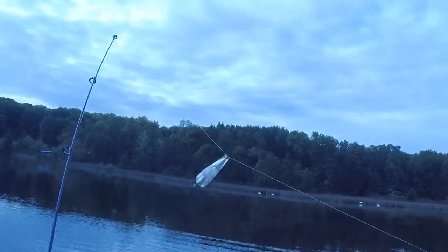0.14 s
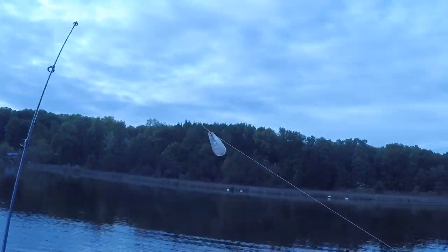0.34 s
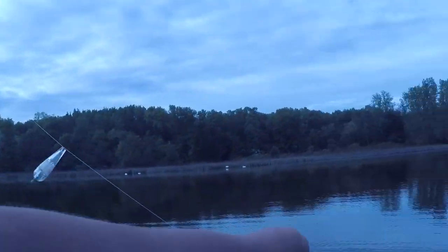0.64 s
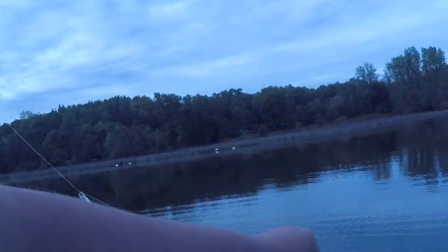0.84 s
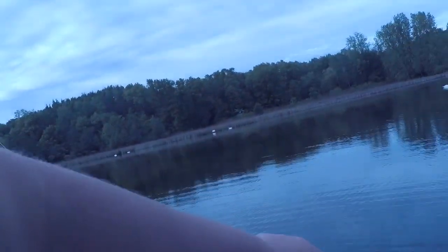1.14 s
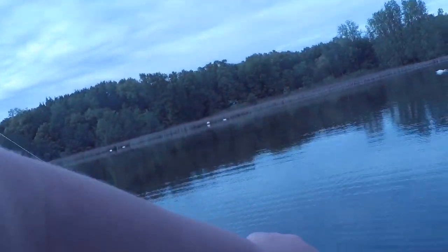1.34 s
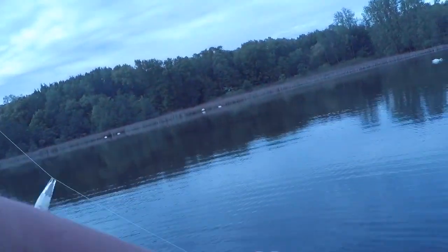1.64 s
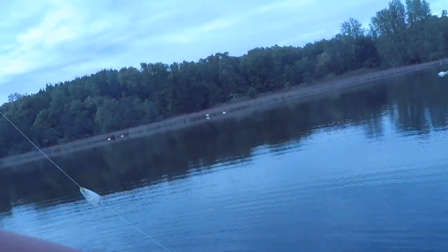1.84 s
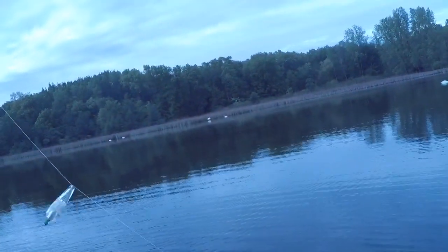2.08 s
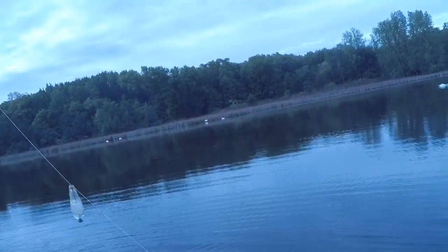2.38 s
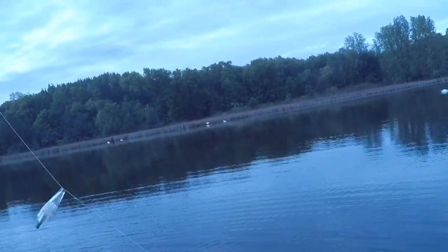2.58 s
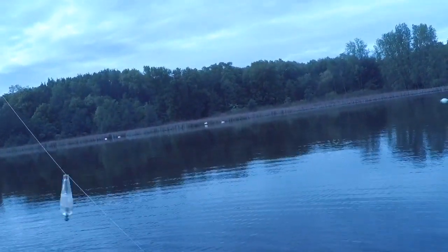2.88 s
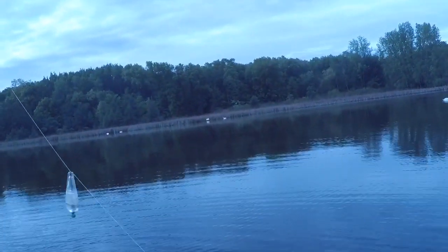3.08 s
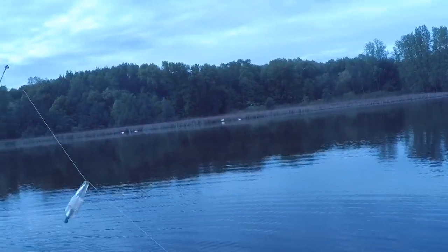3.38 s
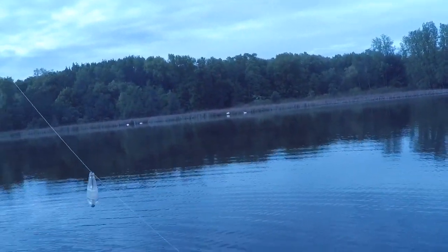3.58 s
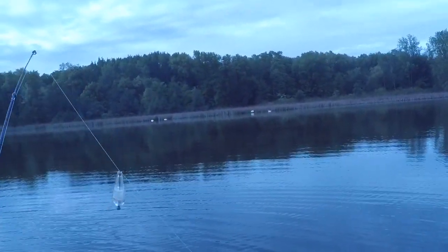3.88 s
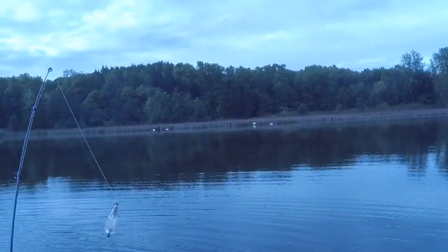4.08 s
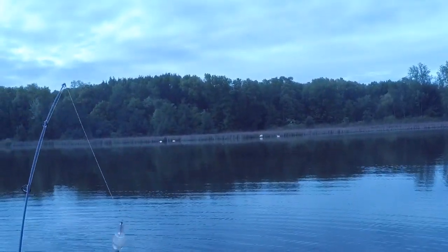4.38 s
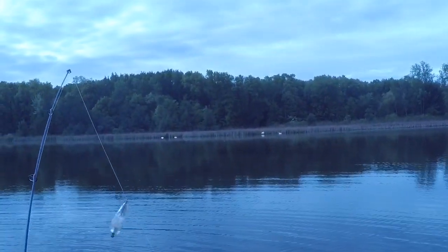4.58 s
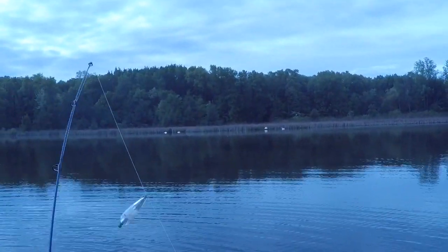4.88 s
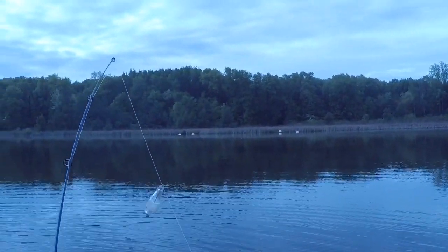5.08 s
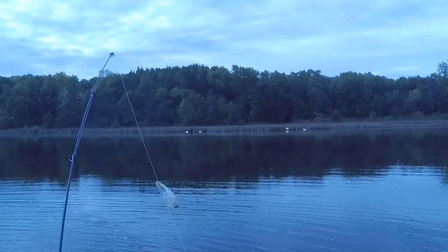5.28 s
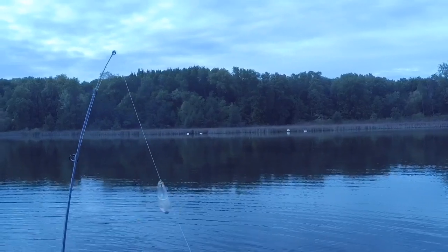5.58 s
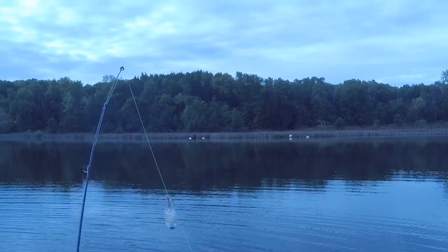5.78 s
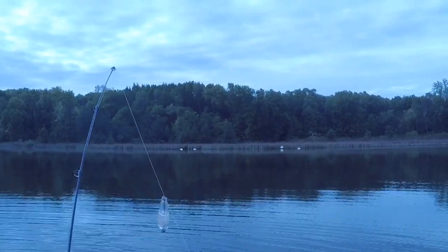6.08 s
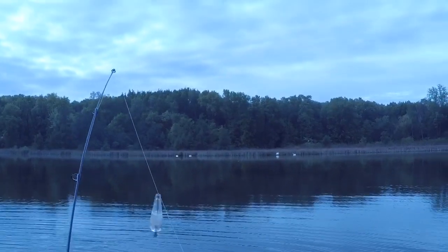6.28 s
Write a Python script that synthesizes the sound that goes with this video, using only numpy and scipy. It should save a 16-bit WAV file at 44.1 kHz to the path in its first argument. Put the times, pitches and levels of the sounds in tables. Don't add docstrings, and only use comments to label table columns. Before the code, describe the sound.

Close fishing-gear ticks, rubs and low thumps against a hard case, a sharp loud crack near four seconds, ending in a distant bird trill.

```python
import sys
import numpy as np
from scipy import signal
from scipy.fft import rfft, irfft
from scipy.io import wavfile

SR = 44100
rng = np.random.default_rng(int(sys.argv[2]) if len(sys.argv) > 2 else 0)


def level_to_linear(level):
    exponent = np.asarray(level, float) / 20
    return 10 ** exponent


def dump(signal):
    limited = np.clip(np.atleast_2d(signal).T, -1, 1)
    pcm = np.round(limited * 32767).astype(np.int16)
    wavfile.write(sys.argv[1], SR, pcm)


N = 283563


def rms_one(x):
    return x / np.sqrt(np.mean(x ** 2) + 1e-20)


def in_time(rows):
    s, *columns = np.transpose(rows)
    return [np.interp(np.arange(N) / SR, s, c) for c in columns]


def add(out, start_s, wave):
    i = max(round(start_s * SR), 0)
    out[i:i + len(wave)] += wave[:N - i]


def drift(rate_hz):
    r = np.exp(-2 * np.pi * rate_hz / SR)
    noise = rng.standard_normal(N + SR)
    return rms_one(signal.lfilter([1], [1, -2 * r, r * r], noise)[SR:])


def band(x, low_hz, high_hz):
    sos = signal.butter(2, [low_hz, high_hz], "band", fs=SR, output="sos")
    return rms_one(signal.sosfilt(sos, x))


def noise_band(low_hz, high_hz):
    return band(rng.standard_normal(N), low_hz, high_hz)


def swells(rows, bed_db):
    t = np.arange(N) / SR
    bells = sum(level_to_linear(db) * np.exp(-((t - middle_s) / half_s) ** 2) for middle_s, half_s, db in rows)
    return level_to_linear(bed_db) + bells


def struck(modes, rise_s, grip):
    t = np.arange(SR // 5) / SR
    rings = 0
    for k, (hz, db, t60) in enumerate(modes):
        rings = rings + (-1) ** k * level_to_linear(db - 60 * (t / t60) ** grip) * np.sin(2 * np.pi * hz * t)
    return rings * (1 - np.exp(-(t / rise_s) ** 2))


def bending_pulse(scale_s, stretch, fade_s, swell_s):
    t = np.arange(SR // 40) / SR
    swings = np.log1p(t / scale_s) / np.log(stretch)
    return np.sin(np.pi * swings) * np.exp(-(t / fade_s) ** 2) * (1 - 0.9 * np.exp(-t / swell_s))


# start_s, peak_db
PAWL_TICKS = [(1.029, -22), (1.146, -22.5), (1.915, -25), (2.058, -29.5), (2.355, -22), (2.472, -29.5),
              (2.557, -26.5), (2.6793, -26.5), (2.827, -25.5), (4.007, -28.5), (4.097, -28), (5.01, -24),
              (5.635, -22.5)]
# start_s, peak_db
PAWL_TOCKS = [(0.975, -31.5), (1.096, -39.5), (1.237, -32), (1.373, -32.5), (1.951, -33.5), (2.114, -40.5),
              (2.41, -37.5), (2.497, -35.5), (2.607, -34.5), (2.765, -37), (3.041, -44.5), (4.953, -37),
              (5.588, -36.5)]


def reel():
    out = np.zeros(N)
    tick = bending_pulse(scale_s=.00007, stretch=2.86, fade_s=0.0054, swell_s=.00002)
    tock = -bending_pulse(scale_s=0.0002, stretch=2.48, fade_s=0.0058, swell_s=0.0056)
    for s, db in PAWL_TICKS:
        add(out, s + 0.00285, level_to_linear(db - 10.0) * tick)
        add(out, s + 0.0095, level_to_linear(db - 19.5) * tick - level_to_linear(db - 32) * tock)
    for s, db in PAWL_TOCKS:
        add(out, s + 0.00272, level_to_linear(db + 8.5) * tock)
    grip_hz = 2400
    return signal.sosfilt(signal.butter(3, grip_hz, fs=SR, output="sos"), out)


# start_s, peak_db, then hollow_db, bright_db, sharp_db relative to the peak
KNOCK_HITS = [(0.4626, -41, -2, -19, -13), (0.6264, -30, -8, -7, -29), (0.63, -28, -3, -4, -23),
              (0.6418, -34.5, 2.5, 6.5, -5), (0.7, -47.5, 9, -4, -20), (0.7649, -46.5, 4, -1, -5),
              (1.2796, -32, 1.5, 6, -6), (1.291, -24.5, 0, -0.5, -32), (3.437, -36, 8, -15, -20),
              (3.8113, -3.5, -11, -2, -19), (3.8129, -10.5, -24, -17, -36), (4.2387, -44, -18, 7.5, 0.5)]
# pitch_hz, level_db, t60_s (time to fade by 60 dB)
BODY_TONES = [(1036, -11.5, 0.0064), (1378, 2.5, 0.0045)]
THUMP_TONES = [(220, -8.5, 0.019)]
HOLLOW_TONES = [(648, 0.5, 0.027), (820, -9.5, 0.026)]
BRIGHT_TONES = [(1800, 2.5, 0.0084), (2113, -4.5, 0.0095), (2544, -6.5, 0.0082)]
SHARP_TONES = [(3160, -11, 0.017), (3440, -6, 0.0038), (4350, -12, 0.0099), (5360, -10, 0.0065),
               (5850, -9, 0.0064), (7270, -21, 0.0079)]
# pitch_hz, level_db, t60_s
AFTER_RING = [(787, -28.5, 0.065), (1067, -25, 0.048), (1904, -31, 0.16), (2641, -36, 0.04)]


def knocks():
    out, contact_s = np.zeros(N), .0018
    body = struck(BODY_TONES, contact_s, grip=3.77) + struck(THUMP_TONES, 0.0027, grip=1.38)
    hollow = struck(HOLLOW_TONES, 0.00083, grip=0.73)
    bright = struck(BRIGHT_TONES, contact_s, grip=1.54) + struck(AFTER_RING, 0.0013, grip=1)
    t = np.arange(len(body)) / SR
    crack_db = -22.5 - 60 * ((t - .0022) / 0.0016) ** 2
    crack = band(rng.standard_normal(len(t)), 6000, 11000) * level_to_linear(crack_db)
    sharp = struck(SHARP_TONES, contact_s, grip=1.74) + crack
    groups = np.array([body, hollow, bright, sharp])
    for s, db, *parts_db in KNOCK_HITS:
        add(out, s - .0004, level_to_linear(db + 5.5 + np.array([0, *parts_db])) @ groups)
    return out


# start_s, pitch_hz, level_db, t60_s
FITTING_RINGS = [
    (0.461, 620, -29, .045),
    (0.645, 1890, -49, .15),
    (0.761, 1190, -36, .04),
    (1.298, 1890, -48, .3),
]
# start_s, pitch_hz, level_db, t60_s
KNUCKLE_RAPS = [(.6258, 1470, -24.5, 0.0068), (.6305, 5800, -50, 0.0068), (.6418, 2480, -34, .006),
                (1.2786, 2150, -18, 0.0081), (1.2798, 2700, -23.5, .008), (1.2895, 1173, -23.5, 0.0072),
                (1.278, 5800, -39, 0.0057), (4.2385, 1170, -26, 0.0069), (4.245, 1150, -38, 0.0079),
                (4.277, 1140, -47, .009), (5.854, 4600, -54, 0.0087), (5.854, 5600, -56, 0.0094),
                (5.854, 6450, -61, .008), (5.899, 5000, -63.5, .012)]


def fittings():
    out = np.zeros(N)
    for s, hz, db, t60 in FITTING_RINGS:
        add(out, s, struck([(hz, db, t60)], rise_s=0.0016, grip=1))
    for s, hz, db, t60 in KNUCKLE_RAPS:
        add(out, s, struck([(hz, db, t60)], rise_s=.002, grip=4))
    return out


# start_s, length_s, shell_db, hollow_db relative to shell
HAND_SCUFFS = [(1.2765, 0.0033, -30.5, -10), (.495, 0.052, -72, 12), (1.288, 0.0041, -58, 11),
               (1.297, 0.013, -52.5, 5), (1.31, 0.024, -54, -2), (.645, 0.011, -63, -11),
               (2.654, 0.042, -55.5, 1.5), (2.87, 0.014, -48, 2.5), (2.915, 0.01, -38, -3),
               (2.942, 0.0084, -54.5, 7.5), (2.898, 0.011, -51.5, -19), (3.083, 0.022, -41.5, 1),
               (3.112, 0.012, -57, 1), (3.19, 0.0099, -64.5, 8.5), (3.258, 0.013, -52, 0.5),
               (3.292, 0.018, -38.5, -2.5), (3.311, 0.0091, -48, -5), (3.338, 0.068, -53.5, -3),
               (3.358, 0.015, -48, -5), (3.405, 0.03, -50.5, 4), (3.45, 0.0083, -61, 2),
               (3.459, 0.015, -36.5, -7), (3.52, 0.02, -51.5, -5), (3.54, 0.017, -52.5, -7),
               (3.563, 0.0087, -52, -3), (3.572, 0.0076, -38.5, -4), (3.586, 0.0047, -36.5, 0.5),
               (3.645, 0.035, -42.5, -5), (3.675, 0.027, -43, -4.5), (3.7, 0.012, -51, -11),
               (3.742, 0.022, -47.5, -9), (3.764, .018, -46.5, -0.5), (3.791, 0.0038, -53, -7),
               (3.8, .008, -52, -12), (3.814, 0.0067, -52, 18), (3.856, 0.014, -34.5, -7),
               (3.895, 0.0039, -59, -14)]
# start_s, length_s, level_db
CLOTH_STROKES = [(0.004, 0.006, -82), (0.065, 0.014, -54.5), (0.122, .005, -53), (0.238, 0.0052, -76),
                 (0.52, 0.0089, -70), (0.843, .008, -54), (1.047, 0.0091, -58), (0.096, 0.0038, -50),
                 (0.1, 0.058, -60.5), (0.26, 0.11, -60), (0.402, 0.072, -55), (0.622, 0.008, -38.5),
                 (0.954, 0.03, -55.5), (1.027, 0.019, -51), (1.33, 0.058, -64), (1.567, 0.051, -63),
                 (1.751, 0.0032, -56), (1.97, 0.0087, -57), (2.44, 0.032, -59.5), (2.48, 0.024, -61),
                 (2.543, 0.018, -53.5), (2.128, 0.0069, -55), (2.733, 0.015, -57.5), (3.011, 0.0049, -60),
                 (3.044, 0.028, -57), (3.932, 0.0066, -67), (4.033, 0.0035, -72), (4.086, 0.024, -62),
                 (4.17, 0.0094, -55.5), (4.192, 0.0094, -55), (4.213, 0.0049, -53.5), (4.297, .007, -61.5),
                 (4.468, 0.0049, -63), (4.657, 0.0092, -66.5), (4.677, .008, -64), (4.746, .006, -62),
                 (5.177, 0.0061, -63.5), (5.341, 0.0057, -57), (5.579, 0.006, -55.5), (4.699, 0.023, -63),
                 (4.827, 0.012, -58), (5.131, 0.01, -57.5), (5.267, 0.057, -60.5), (5.361, 0.0085, -52.5),
                 (5.39, 0.0051, -52.5), (5.518, 0.024, -57), (5.607, 0.0041, -51.5)]
# start_s, level_db
CAVITY_TAPS = [(0.638, -62), (1.144, -53), (2.522, -53), (2.987, -61), (4.122, -58.5), (4.151, -61.5),
               (4.244, -57), (4.283, -60.5), (4.346, -64.5), (4.481, -52.5), (4.546, -49.5), (4.647, -62),
               (4.734, -53), (4.984, -47.5), (5.046, -53.5), (5.314, -81), (6.075, -69)]


def contacts():
    tap_hollow_db, stroke_hollow_db = 7, -7
    slips = [(.757 + k * .0455, 0.007, -56.5, tap_hollow_db) for k in range(5)]
    strokes = [(s, length, db, stroke_hollow_db) for s, length, db in CLOTH_STROKES]
    taps = [(s, 0.0084, db, tap_hollow_db) for s, db in CAVITY_TAPS]
    return HAND_SCUFFS + slips + strokes + taps


# time_s, level_db
RUB_PRESSURE = [(0.0, -53.5), (0.11, -62), (0.53, -59), (0.72, -59.5), (1.07, -63.5), (1.52, -73.5),
                (2.04, -61.5), (2.65, -66), (3.31, -68.5), (3.47, -57.5), (3.72, -56.5), (3.87, -58.5),
                (4.12, -68), (4.32, -72), (4.6, -65.5), (5.28, -72), (5.53, -67), (6.43, -71.5)]


def rubbing_force():
    rub_db, = in_time(RUB_PRESSURE)
    shell = level_to_linear(rub_db + 1.0 * drift(25) + 3.7 * drift(1.2))
    cavity = shell * level_to_linear(-2.5)
    for s, length, db, hollow_db in contacts():
        t = np.arange(int((length + .03) * SR)) / SR
        rise = np.minimum(t / (0.0022 + 0.25 * length), 1)
        stroke = level_to_linear(db) * rise * np.exp(-np.maximum(t - length, 0) / 0.0044)
        add(shell, s, stroke)
        add(cavity, s, stroke * level_to_linear(hollow_db))
    return shell, cavity


def rough_grit():
    grit = rng.standard_normal((2, N)) * level_to_linear(2.5 * drift(294.8))
    snags_per_s, snag_db = 450, 8.5
    return grit * (1 + level_to_linear(snag_db) * (rng.random(N) < snags_per_s / SR))


def resonate(x, peaks):
    out = 0
    for k, (hz, width_hz, db) in enumerate(peaks):
        r = np.exp(-np.pi * width_hz / SR)
        ring = signal.lfilter([1, 0, -1], [1, -2 * r * np.cos(2 * np.pi * hz / SR), r * r], x)
        out = out + (-1) ** k * level_to_linear(db) * (1 - r * r) * ring
    return out


# pitch_hz, width_hz, level_db
CAVITY_PEAKS = [(617, 270, -9.5), (790, 110, -1.5), (1053, 270, 1), (1284, 618, -1.5)]
# pitch_hz, width_hz, level_db
SHELL_PEAKS = [(1820, 260, 3), (2340, 550, 6), (2656, 197, 9.5), (3310, 210, -8), (3900, 160, -8),
               (4400, 460, -16.5), (5800, 270, -10.5), (7180, 290, -52.5)]


def friction(shell, cavity, grit):
    low = resonate(grit[0] * cavity, CAVITY_PEAKS) / np.std(resonate(grit[0], CAVITY_PEAKS))
    high = resonate(grit[1] * shell, SHELL_PEAKS) / np.std(resonate(grit[1], SHELL_PEAKS))
    wall_hz = 7000
    case = signal.sosfilt(signal.butter(4, wall_hz, fs=SR, output="sos"), low + high)
    shove = level_to_linear(-5.5) * cavity * band(noise_band(69.93, 290), 69.93, 290)
    return case + shove


# start_s, peak_db
PING_GRAINS = [(1.294, -50), (2.653, -55), (2.662, -59), (2.693, -44), (2.7, -50), (2.922, -33),
               (3.097, -31.5), (3.302, -27), (3.453, -53), (3.478, -36), (3.542, -42), (3.562, -38),
               (3.581, -27), (3.625, -43), (3.65, -31.5), (3.663, -31), (3.716, -43), (3.845, -42),
               (3.895, -39), (4.043, -48.5), (4.237, -46), (5.829, -62)]
# pitch_hz, level_db, t60_s
PING_TONES = [(2700, 2.5, 0.028), (2595, -6, 0.018)]


def pings():
    out, ring = np.zeros(N), struck(PING_TONES, 0.0013, grip=0.99)
    for s, db in PING_GRAINS:
        add(out, s, level_to_linear(db) * ring)
    return out


# middle_s, half_length_s, level_db
SLEEVE_PASSES = [
    (0.2, 0.41, -58),
    (0.7, 0.23, -53.5),
    (1.4, 0.39, -64),
    (2.62, 0.13, -62),
    (3.8, 0.15, -59.5),
    (5.25, 0.16, -73.5),
]


def sleeve(grit):
    flutter = level_to_linear(-6.0 + 2.0 * drift(30))
    swish = swells(SLEEVE_PASSES, bed_db=-87.0) * flutter * band(noise_band(2950, 4090), 2800, 4740)
    dull = band(band(grit[0], 2800, 3500), 2800, 3500)
    return swish + swells(SLEEVE_PASSES[:2], bed_db=-93) * level_to_linear(-16.0) * dull


def swing(hz, damping, lean):
    t = np.arange(-SR // 25, SR // 25) / SR
    return -np.cos(2 * np.pi * hz * t + lean) * np.exp(-(damping * hz * t) ** 2)


# time_s, level_db
BODY_SWAY = [(0.0, -44), (0.5, -42.5), (0.88, -44), (1.23, -39), (1.59, -53.5), (2.4, -47.5), (2.9, -47),
             (3.76, -48.5), (4.15, -45.5), (4.48, -48), (5.6, -51), (6.43, -55)]
# middle_s, half_length_s, level_db
BODY_LURCHES = [(1.55, 0.045, -43.5), (1.77, 0.2, -48), (2.09, 0.032, -36.5), (2.27, 0.013, -61),
                (2.38, 0.033, -42.5), (2.76, 0.011, -35.5), (2.89, 0.034, -47), (3.29, 0.028, -40),
                (3.73, 0.043, -44), (3.89, 0.082, -40.5), (4.55, 0.053, -38.5), (4.77, 0.067, -44),
                (5.01, 0.042, -41.5), (5.19, 0.042, -47), (5.61, 0.018, -49), (5.86, 0.057, -43.5)]
# middle_s, half_length_s, level_db
MOUNT_SHAKES = [(1.3, 0.14, -54), (1.6, 0.037, -72), (2.1, 0.054, -66), (2.38, 0.11, -50),
                (2.52, 0.044, -45), (2.72, 0.065, -60), (2.9, 0.079, -50), (3.4, 0.37, -62),
                (4.12, 0.13, -48.5), (4.3, 0.012, -41), (4.56, 0.019, -50), (4.8, .1, -60.5),
                (5.3, .06, -59), (5.7, 0.042, -55), (6.03, 0.31, -57.5)]
# middle_s, peak_db, pitch_hz
MOUNT_THUDS = [(0.133, -34, 60), (0.595, -35, 69.5), (0.778, -38, 82), (0.904, -34, 53.0),
               (0.935, -29, 51.7), (1.213, -30, 48), (1.449, -40, 82.0), (1.507, -33.5, 85.6),
               (2.106, -34, 48.0), (2.252, -34.5, 78.4), (2.381, -37, 59.0), (2.884, -27.5, 61.5),
               (2.958, -29.5, 75), (3.202, -35, 58.0), (3.327, -32, 62.0), (3.38, -28.5, 76),
               (3.885, -30, 77.5), (3.953, -38, 56), (4.557, -33.5, 70.6), (4.995, -25.5, 87.5),
               (5.061, -32.5, 78),
               (0.077, -35, 86), (0.365, -36, 100), (0.462, -31, 163), (0.503, -40, 96), (0.535, -38, 118),
               (0.6397, -24, 106), (0.806, -36, 141), (1.2955, -29.5, 88), (2.175, -36, 120),
               (2.69, -27.5, 55.6), (3.068, -35.5, 119), (3.125, -31, 122), (3.271, -31.5, 123),
               (3.299, -33, 151), (3.438, -40, 183), (3.594, -35, 144), (3.863, -35, 113.6),
               (4.488, -31, 125), (4.75, -28.5, 111), (5.535, -33, 101)]
# middle_s, peak_db, pitch_hz
SHORT_JOLTS = [(0.307, -51, 220), (0.369, -41.5, 225), (0.402, -43, 220), (0.482, -40, 199),
               (0.495, -44, 220), (0.563, -45, 220), (0.631, -29, 203), (0.637, -24, 202),
               (0.706, -27.5, 205), (0.862, -44, 230), (0.934, -42, 200), (0.963, -44, 260),
               (1.335, -40, 220), (1.501, -48, 200), (1.612, -46, 196), (2.243, -42.5, 201),
               (2.671, -39, 205), (2.882, -31, 220), (2.966, -45, 180), (3.053, -38, 195),
               (3.257, -49, 220), (3.323, -42, 200), (3.376, -37, 200), (3.4299, -33, 261),
               (3.444, -27, 203), (3.452, -31, 196), (3.688, -38, 202), (3.767, -35, 200),
               (3.827, -26, 201), (3.839, -46, 200), (3.891, -40, 202), (4.29, -46.5, 230),
               (4.545, -44, 220), (4.565, -38, 177), (4.781, -46, 220), (4.865, -47.5, 260),
               (4.968, -55.5, 220), (5.328, -47.5, 302),
               (0.474, -41, 200), (.91, -42, 220), (2.678, -46, 250), (2.871, -44, 220), (3.062, -44, 200),
                (3.596, -30, 254), (3.674, -49, 200), (3.879, -46, 200), (4.47, -48, 280),
                (4.555, -37, 220)]
# middle_s, peak_db, pitch_hz
WALL_RAPS = [
    (0.6324, -21.5, 1010),
    (2.674, -39.5, 1300),
    (2.879, -56, 700),
    (3.297, -52, 596),
    (3.4293, -34, 920),
    (3.438, -24.5, 1110),
    (3.588, -43, 604),
    (3.68, -30.5, 1300),
    (4.553, -41, 740),
]


def sway():
    heave_db, = in_time(BODY_SWAY)
    out = swells(BODY_LURCHES, heave_db) * noise_band(15.6, 44.6)
    rumble = level_to_linear(-9.5 + 1.0 * drift(37)) * noise_band(48, 192.0)
    out += swells(MOUNT_SHAKES, bed_db=-61) * rumble
    centre_s = .04
    tugs = MOUNT_THUDS
    for (s, db, hz), lean in zip(tugs, rng.uniform(-0.81, 1, len(tugs))):
        add(out, s - centre_s, level_to_linear(db - 2.0) * swing(hz, damping=2.56, lean=0.2 * lean))
    for s, db, hz in SHORT_JOLTS:
        add(out, s - centre_s, level_to_linear(db - 3.5) * swing(hz, damping=1.4, lean=0))
    for s, db, hz in WALL_RAPS:
        add(out, s - centre_s, level_to_linear(db) * swing(hz, damping=0.74, lean=0))
    return out


def note(length_s, start_hz, middle_hz, end_hz):
    u = np.linspace(0, 1, int(length_s * SR))
    hz = np.polyval(np.polyfit([0, .5, 1], [start_hz, middle_hz, end_hz], 2), u)
    loudness = np.minimum(2.5 * np.sin(np.pi * u), 1) ** 1.7
    return np.sin(2 * np.pi * np.cumsum(hz) / SR) * loudness


def chip(bend, fall_db):
    length_s, foot_hz, top_hz = 0.0212, 3710, 4445
    u = np.linspace(-1, 1, int(length_s * SR))
    hz = bend * (top_hz - (top_hz - foot_hz) * np.abs(u) ** 2.49)
    loudness = level_to_linear(fall_db * (u + 1) / 2) * np.minimum(2.5 * (1 - u * u), 1)
    return loudness * np.sin(2 * np.pi * np.cumsum(hz) / SR)


# time_s, pitch_hz, level_db
LONG_WHISTLE = [
    (5.69, 2545, -81),
    (5.73, 2252, -52),
    (5.76, 2200, -52.5),
    (5.84, 2218, -54),
    (5.875, 2163, -63.5),
    (5.89, 2180, -73.5),
]
# time_s, pitch_hz, level_db
REPLY = [
    (6.236, 2509, -81),
    (6.265, 2443, -61),
    (6.312, 2370, -72.5),
    (6.39, 2490, -62.5),
    (6.43, 2480, -70.5),
]
# start_s, middle_hz, level_db
SHORT_DROPS = [(4.198, 3950, -70), (4.29, 4050, -75), (4.558, 4170, -65), (5.28, 4220, -72),
               (5.42, 2890, -72), (5.452, 2870, -77), (5.48, 2900, -74), (5.51, 2900, -75),
               (5.59, 2850, -74), (5.655, 2800, -75), (6.275, 3440, -75.5), (6.3, 3420, -76.5)]
# start_s, length_s, pitch_hz, level_db
THIN_NOTES = [(.2, 0.059, 2460, -67), (2.995, 0.042, 4130, -78), (3.515, 0.02, 4326, -62.5),
              (3.84, 0.023, 4340, -67), (3.923, 0.018, 4360, -68), (4.02, 0.023, 4390, -73),
              (4.073, 0.036, 4320, -71), (4.15, .03, 4400, -80), (1.832, 0.05, 4020, -75),
              (5.622, 0.02, 4320, -67)]
# start_s, middle_hz, level_db
FALLING_NOTES = [
    (4.361, 4220, -77),
    (4.374, 4170, -73),
    (4.468, 4200, -72),
]
# start_s, length_s, held_hz, end_hz, level_db
LOW_WHISTLES = [
    (3.955, 0.11, 2190, 2180, -64),
]
# start_s, peak_db
TRILL = [
    (5.702, -53),
    (5.785, -50.5),
    (5.878, -49.5),
    (5.97, -48.5),
    (6.067, -48.5),
    (6.158, -48),
    (6.262, -48.5),
    (6.377, -45),
]
# start_s, length_s, start_hz, end_hz, level_db
NEAR_NOTES = [(0.012, .055, 4240, 4350, -56.5), (0.29, .055, 4210, 4230, -61.5),
              (.345, .03, 4190, 4200, -63), (0.439, .03, 4580, 4430, -60),
              (0.563, 0.041, 4240, 4240, -59.5), (0.843, 0.035, 4130, 4030, -56.5),
              (1.962, .022, 4130, 3800, -58), (3.012, .022, 4200, 4250, -60),
              (3.438, .022, 4030, 4350, -57), (3.596, .018, 4330, 4330, -56), (5.293, .04, 3420, 3420, -67),
              (5.325, .045, 3400, 3370, -67)]


def birds():
    hz, whistle_db = in_time([(5.66, 2600, -95), *LONG_WHISTLE, (5.91, 2190, -90)])
    out = level_to_linear(whistle_db + 2.5) * np.sin(2 * np.pi * np.cumsum(hz) / SR)
    hz, reply_db = in_time([(6.2, 2520, -95), *REPLY])
    begun = np.arange(N) > 6.2 * SR
    out += level_to_linear(reply_db + 3.5) * begun * np.sin(2 * np.pi * np.cumsum(hz) / SR)
    for s, hz, db in SHORT_DROPS:
        add(out, s, level_to_linear(db + 8.5) * note(0.018, 1.03 * hz, hz, hz / 1.03))
    for s, length, hz, db in THIN_NOTES:
        add(out, s, level_to_linear(db + 8.5) * note(length, .992 * hz, hz, .992 * hz))
    for s, hz, db in FALLING_NOTES:
        add(out, s, level_to_linear(db + 17.5) * note(0.0167, 1.05 * hz, hz, 0.88 * hz))
    for s, length, hz, end_hz, db in LOW_WHISTLES:
        add(out, s, level_to_linear(db + 2.5) * note(length, 1.025 * hz, hz, end_hz))
    variety = rng.normal([1, -2], [.007, 2.5], (len(TRILL), 2))
    for (s, db), (bend, fall_db) in zip(TRILL, variety):
        add(out, s - .002, level_to_linear(db - 0.5) * chip(bend, fall_db))
    for s, length, start_hz, end_hz, db in NEAR_NOTES:
        add(out, s, level_to_linear(db) * note(length, start_hz, (start_hz + end_hz) / 2, end_hz))
    t = np.arange(SR // 5) / SR
    trees = rng.standard_normal(len(t)) * level_to_linear(-33.5 - 60 * t / 0.14)
    return out + signal.fftconvolve(out, trees)[:N]


# middle_s, half_length_s, level_db
CHORUS_SWELLS = [
    (0.78, 0.21, -65),
    (3.03, 0.17, -67),
    (3.48, .08, -66),
    (3.72, 0.072, -68),
    (4.6, 0.34, -68),
]


def far_chorus():
    flicker = level_to_linear(3.0 * drift(25))
    voices = band(noise_band(3850, 4500), 3850, 4500)
    return level_to_linear(-6.0) * swells(CHORUS_SWELLS, bed_db=-69.5) * flicker * voices


# pitch_hz, level_db (per Hz)
HISS_SHAPE = [(180, -51.5), (300, -14.5), (378, -7), (1180, -11), (1660, -7), (2700, -9.5), (5020, -14),
              (15400, -22.5)]


def hiss():
    hz, db = np.transpose(HISS_SHAPE)
    f = np.arange(1, N // 2 + 2) * SR / N
    shape = level_to_linear(np.interp(np.log(f), np.log(hz), db))
    return level_to_linear(-64.5) * rms_one(irfft(rfft(rng.standard_normal(N)) * shape, N))


def scene():
    shell, cavity = rubbing_force()
    grit = rough_grit()
    chorus = far_chorus()
    cloth = sleeve(grit) + friction(shell, cavity, grit)
    handling = cloth + sway() + reel() + knocks() + fittings() + pings()
    return (handling + birds() + chorus + hiss())[None]


def roll_off(x):
    return signal.sosfilt(signal.butter(12, 15530, fs=SR, output="sos"), x)


def record(dry):
    return roll_off(1.193 * np.tanh(dry / 1.311))


dry = scene()
out = record(dry)
dump(out)
```